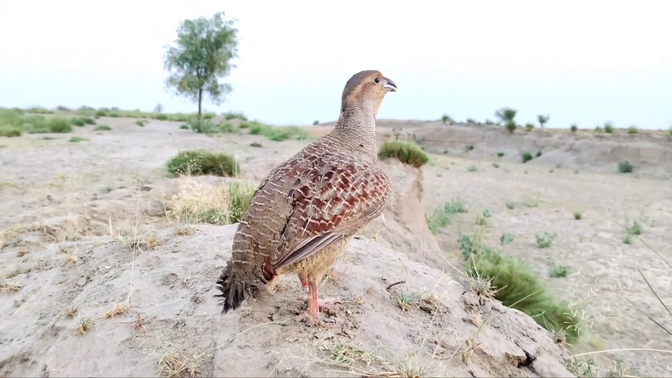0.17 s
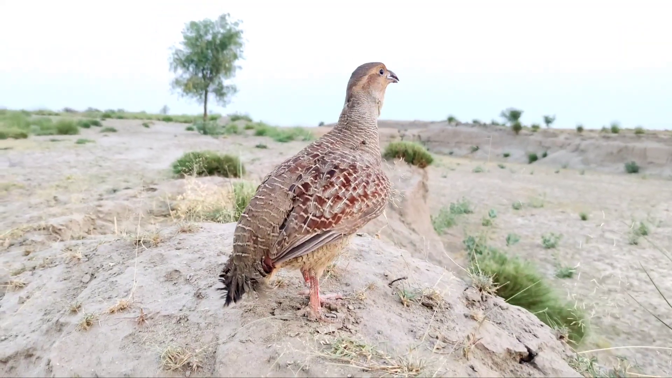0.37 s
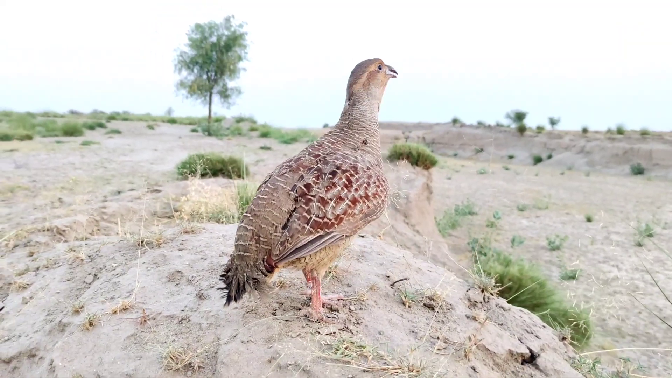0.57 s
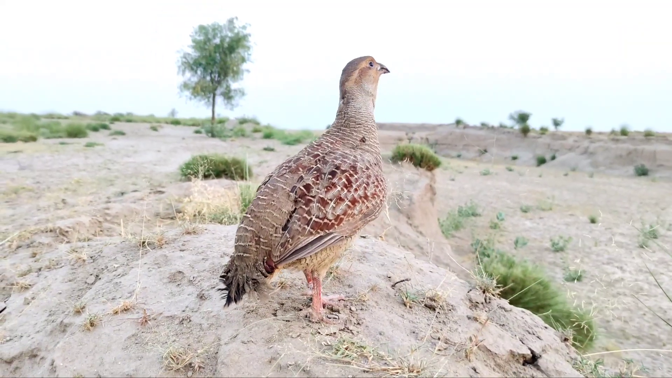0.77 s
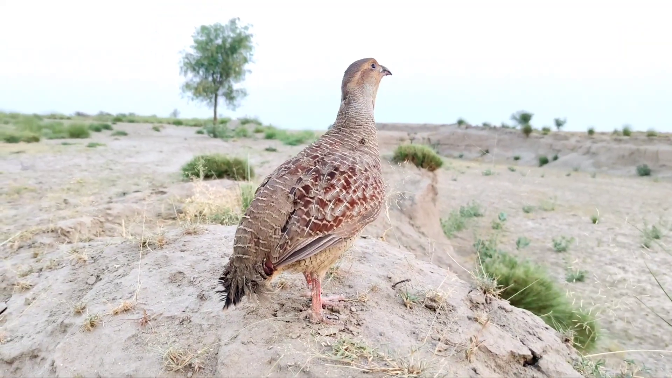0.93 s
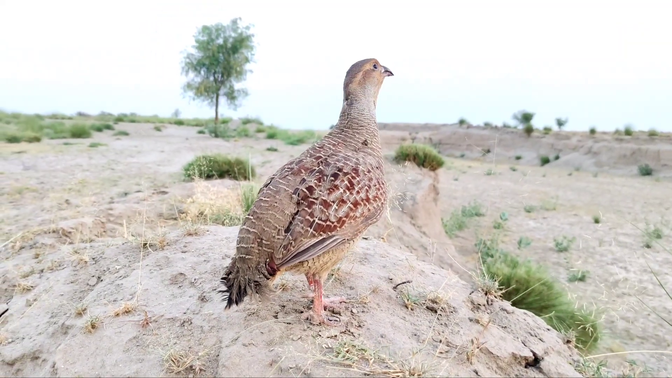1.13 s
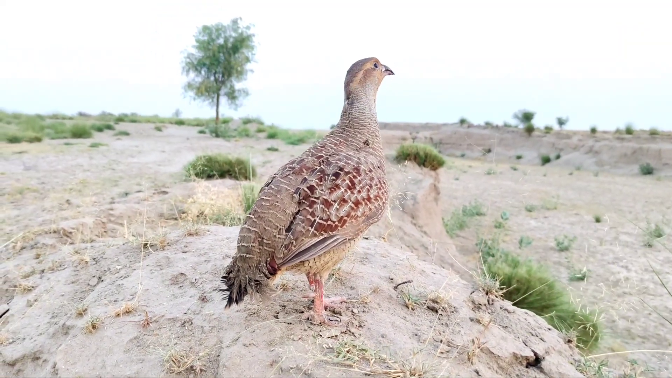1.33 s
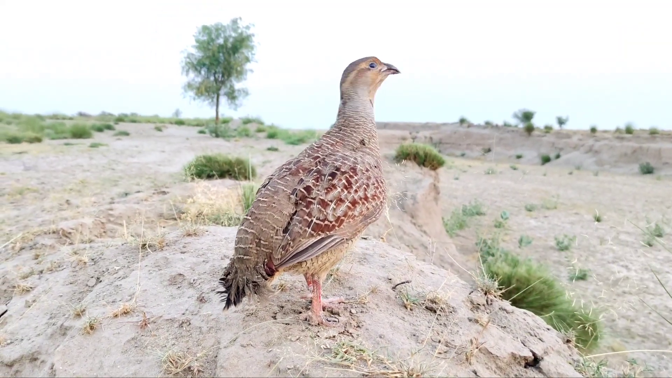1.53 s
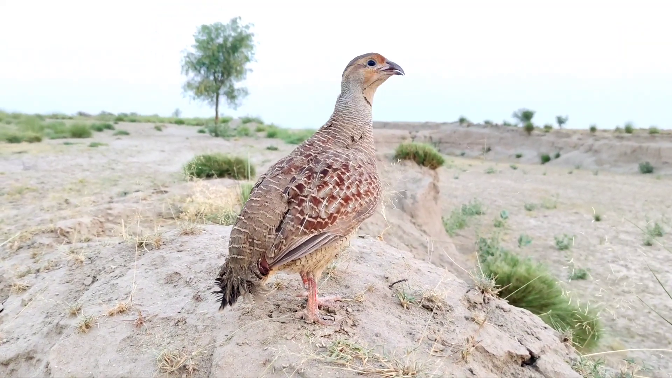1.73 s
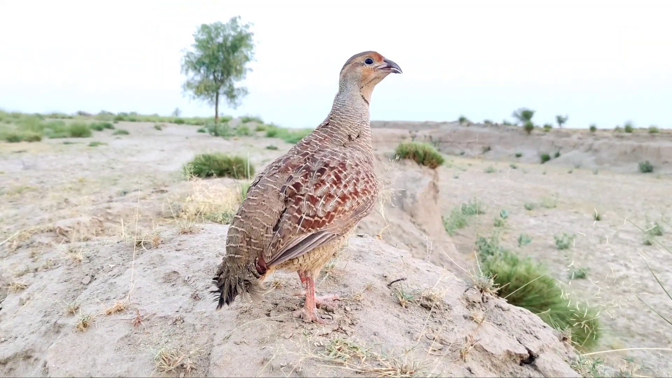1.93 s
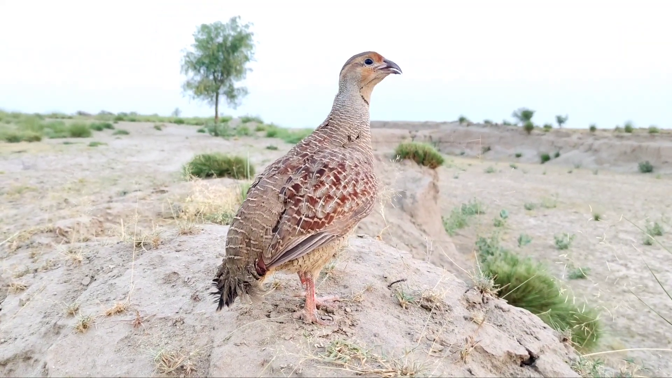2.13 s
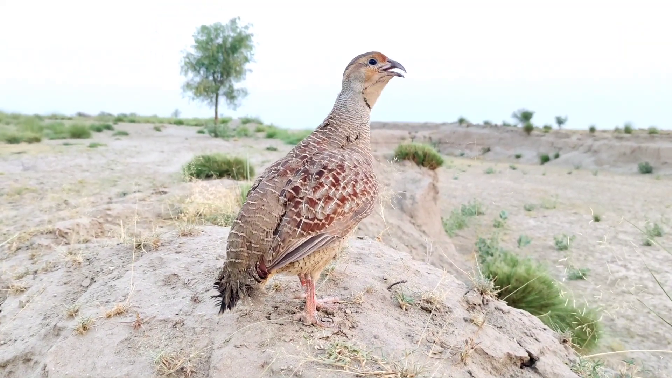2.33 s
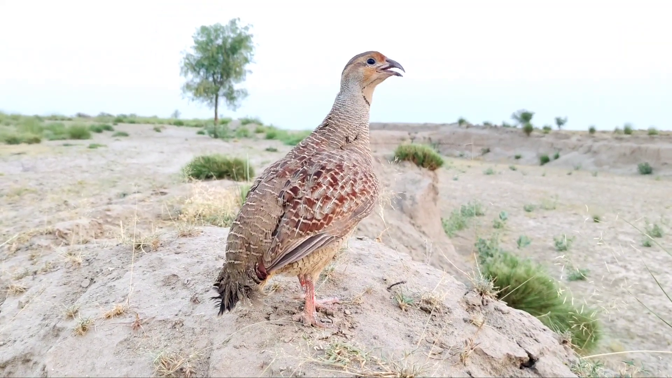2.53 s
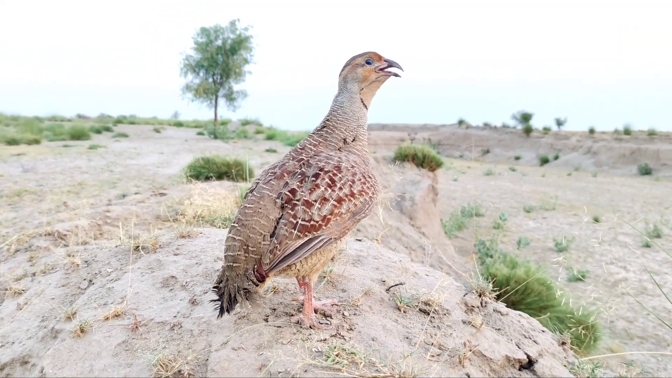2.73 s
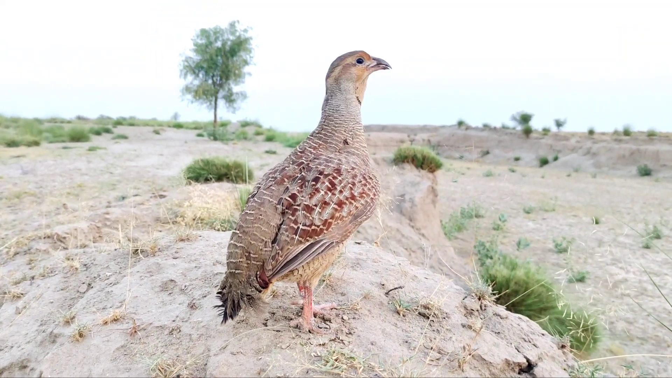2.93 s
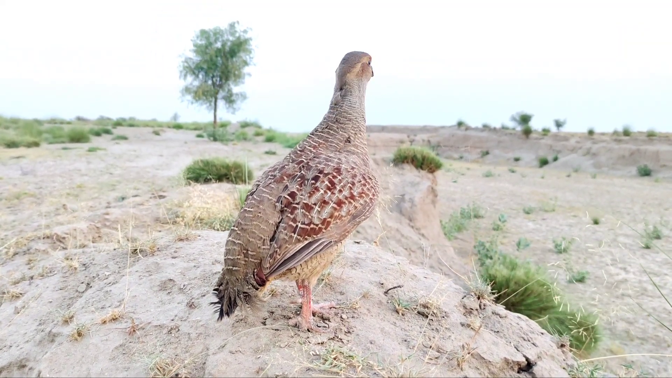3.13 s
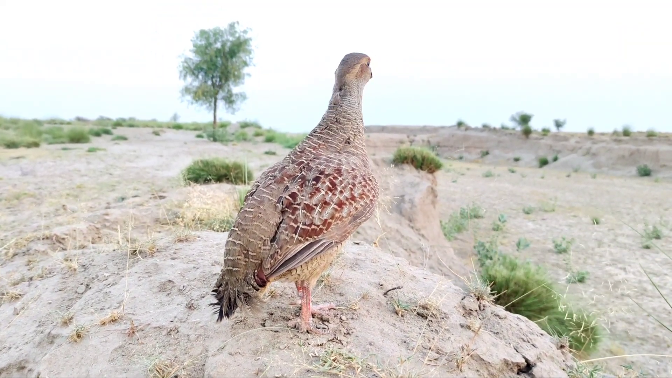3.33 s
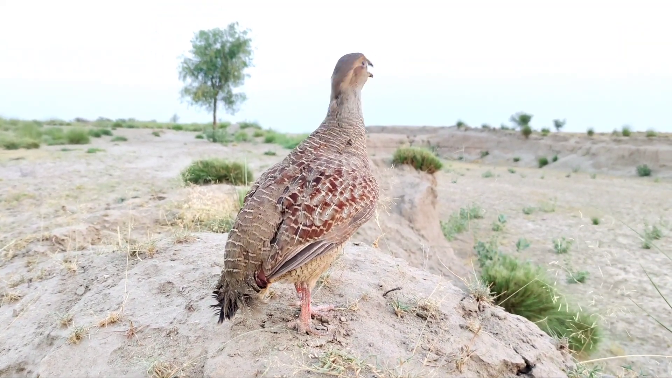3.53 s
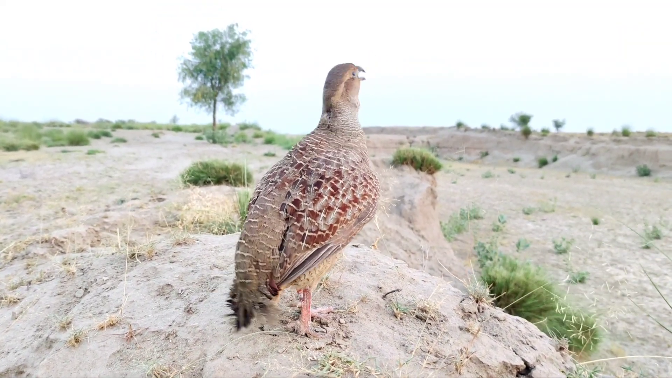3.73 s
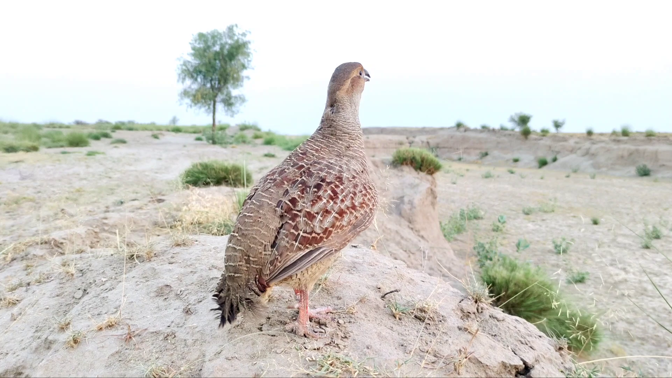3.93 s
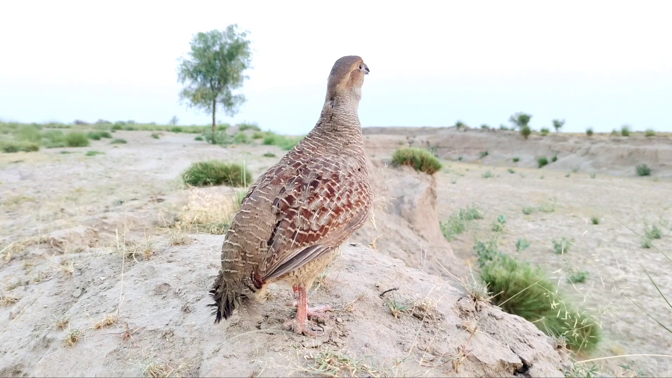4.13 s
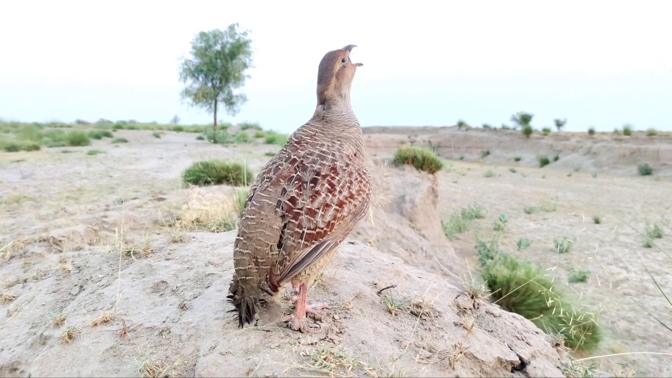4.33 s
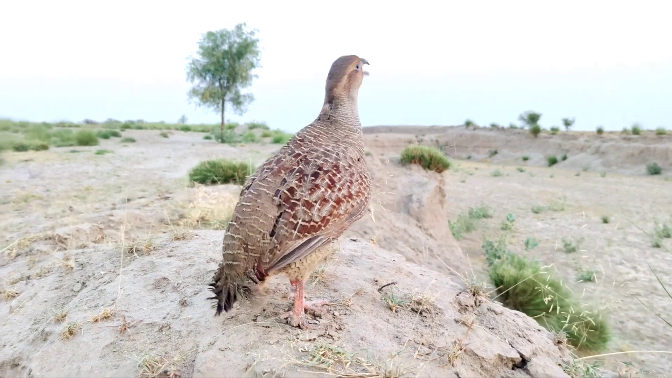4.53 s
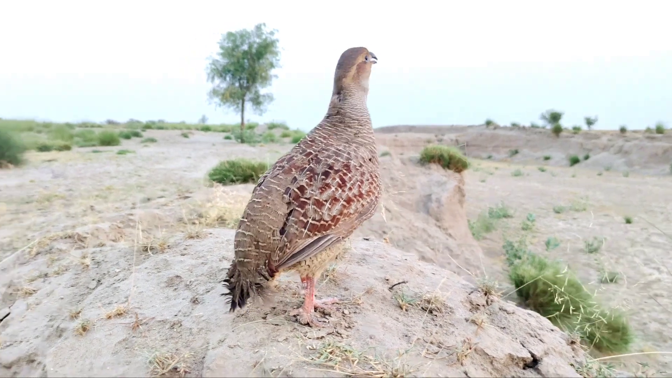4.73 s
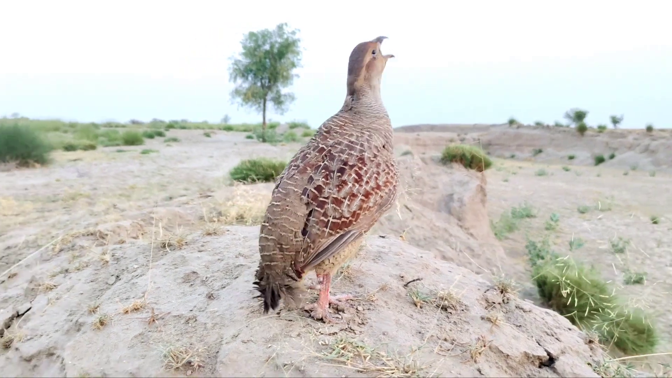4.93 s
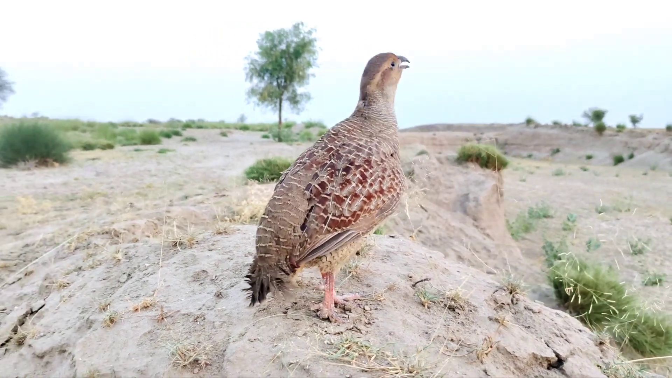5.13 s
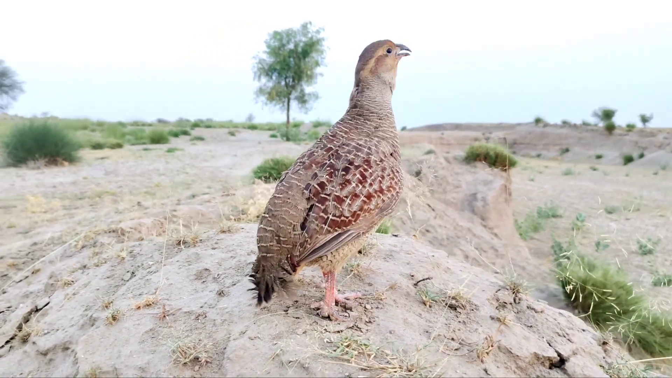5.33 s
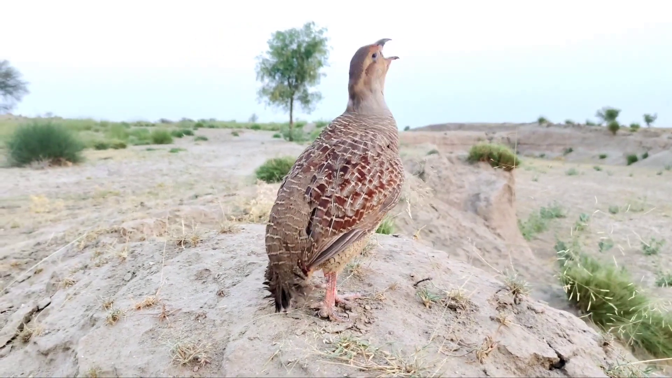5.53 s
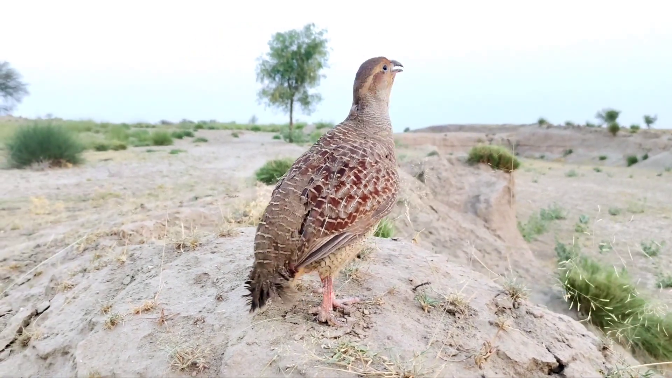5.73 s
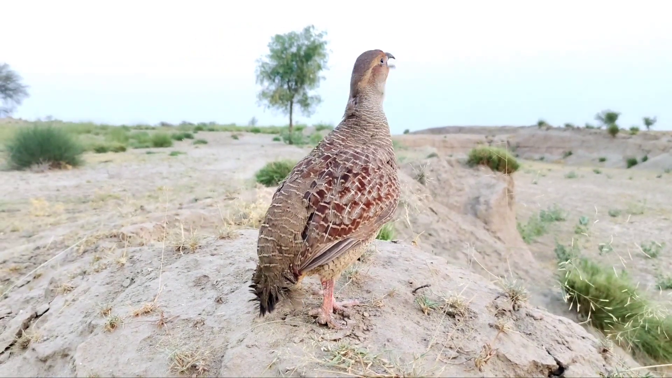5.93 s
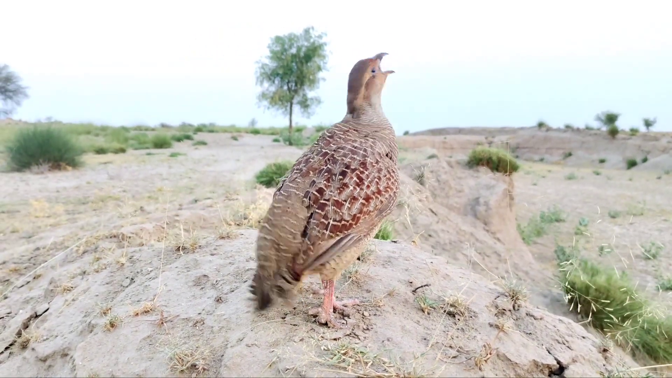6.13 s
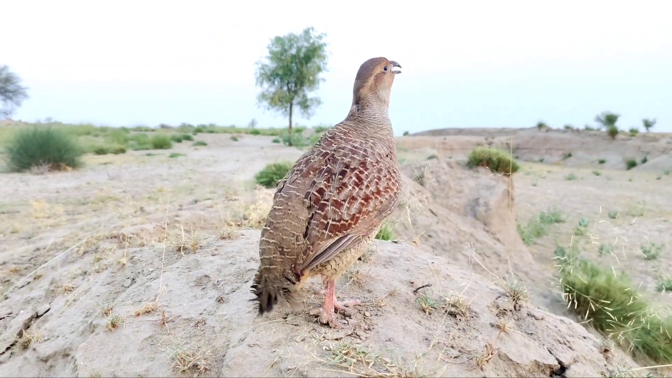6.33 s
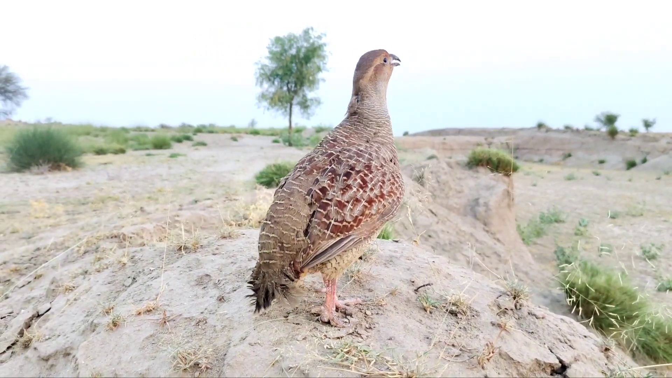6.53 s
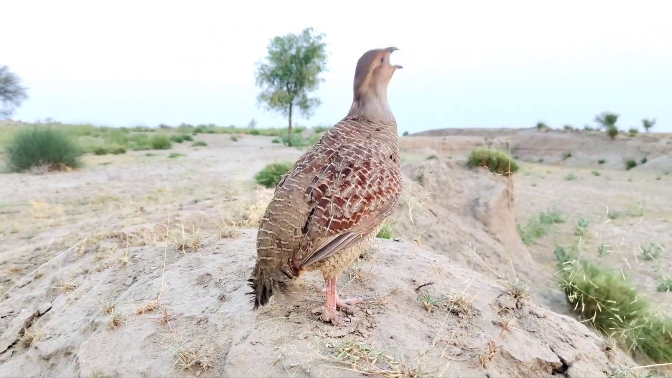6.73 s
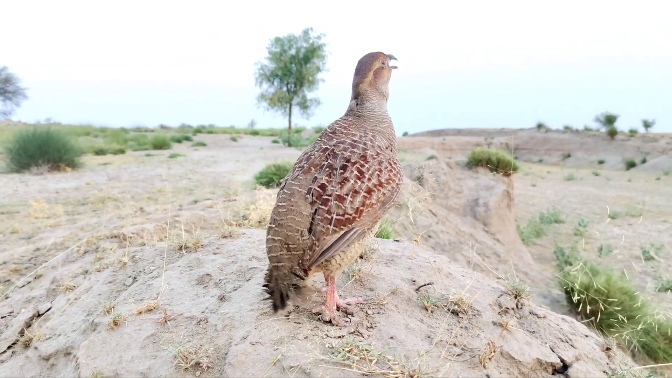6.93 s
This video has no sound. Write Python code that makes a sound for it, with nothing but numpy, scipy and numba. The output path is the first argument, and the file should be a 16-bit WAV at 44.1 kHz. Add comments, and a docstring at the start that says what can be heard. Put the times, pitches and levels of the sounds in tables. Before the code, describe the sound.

Two ground birds call close to the microphone in open dry scrub. One opens with a short shrill call and a run of fading throaty clucks, then goes quiet while the other gives evenly spaced, clear upward whistles. Midway the first bird breaks into loud, fast, ringing three-part phrases until the end, the whistles growing fainter beneath. Light wind and tiny distant bird chirps lie behind, with almost no echo.

```python
"""Francolin duet in open scrub

Two francolins call close by, spread over two ports. The cock's syllables start as a croak of syrinx
pulses through throat resonances, lock onto clear harmonic tones and croak out again.
The hen answers with long near-sine whistles that scoop up and end in a diffuse, fading tail.
A coloured noise halo follows the loudness of each call. Beneath lie wind of shaped noise,
far songbird sweeps with a dull tick, and a faint echo of the cock."""
import sys
import numpy as np
from scipy import signal
from scipy.fft import rfft, irfft, next_fast_len
from scipy.io import wavfile
from scipy.ndimage import uniform_filter1d
from numba import njit

SR = 44100
rng = np.random.default_rng(int(sys.argv[2]) if len(sys.argv) > 2 else 0)


def inscribe(sig):
    """Save sig as 16-bit PCM at rate SR to the path in sys.argv[1].

    A 1-D sig is mono; a 2-D sig holds one channel per row.
    Samples are clipped to [-1, 1] before scaling.
    """
    pcm = np.round(np.clip(np.atleast_2d(sig).T, -1, 1) * 32767)
    wavfile.write(sys.argv[1], SR, pcm.astype(np.int16))


N = 308249
T = np.arange(N) / SR
TOP_HZ = 15600  # upper edge of harmonics and output

# how hoarse the cock is, worst among his first keks and then clearing: (time [s], hoarseness [about 0-1])
HOARSENESS = [(3.75, .15), (3.98, 0.8), (4.26, 1.1), (4.4, 0.1), (4.7, 0.01)]


def undb(db):
    """Decibels to amplitude."""
    return 10 ** (np.asarray(db) / 20)


def span(start, end):
    """Samples of a note and the position 0-1 along it."""
    part = slice(int(start * SR), min(int(end * SR), N))
    return part, np.linspace(0, 1, part.stop - part.start)


def follow(table):
    """Control that glides through (time, value) points."""
    return np.interp(T, *np.transpose(table))


def soften(x, s):
    """Round the corners of a control with two moving averages of s seconds."""
    size = int(s * SR) + 1
    return uniform_filter1d(uniform_filter1d(x, size), size)


def walk(rate_hz):
    """Smooth random wander of spread 1."""
    x = soften(rng.standard_normal(N), 1 / rate_hz)
    return x / x.std()


def hiss(spectrum):
    """Noise of rms 1 with the given colour."""
    hz, db = np.transpose(spectrum)
    size = next_fast_len(N)
    bins = np.arange(size // 2 + 1) * SR / size
    gain = undb(np.interp(np.log(bins + 1), np.log(hz), db))
    x = irfft(rfft(rng.standard_normal(size)) * gain, size)[:N]
    return x / x.std()


@njit
def band_pass(x, hz, width):
    """State-variable band-pass with a moving centre and a width in Hz."""
    y, b, l = np.empty(len(x)), 0., 0.
    for i in range(len(x)):
        g, k = np.tan(np.pi * hz[i] / SR), width / hz[i]
        v = (b + g * (x[i] - l)) / (1 + g * (g + k))
        b, l, y[i] = 2 * v - b, l + 2 * g * v, k * v
    return y


def noise_band(hz, width):
    """White noise narrowed around a fixed or moving centre."""
    return band_pass(rng.standard_normal(N), np.full(N, 1.) * hz, width)


def pair(db, lead):
    """Complex gains of the two ports for a level difference and a phase lead; their mean is near 1 in size."""
    half = undb(db / 2) * np.exp(.5j * lead)
    return 2 * np.array([half, 1 / half]) / abs(half + 1 / half + .12)


def ports(x, table):
    """Split level and phase between the two ports by frequency."""
    hz, db, lead = np.transpose(table)
    size = next_fast_len(N)
    f = np.arange(size // 2 + 1) * SR / size
    gains = pair(np.interp(f, hz, db), np.interp(f, [0, *hz], [0, *lead]))
    return irfft(rfft(x, size) * gains, size)[:, :N]


def moving_ports(x, table):
    """Split level and phase of a narrow sound between the ports as its bearing changes."""
    s, db, lead = np.transpose(table)
    gains = pair(np.interp(T, s, db), np.interp(T, s, lead))
    return np.real(signal.hilbert(x, next_fast_len(N))[:N] * gains)


def noise_halo(gain):
    """Coloured noise around a call, following its loudness, partly unrelated at the two ports."""
    # colour of the halo: (frequency [Hz], relative level [dB])
    halo_colour = [(300, -11), (1500, 2), (4500, -5), (6500, -32.5), (10000, -12.5), (15000, -24.5)]
    return gain * (hiss(halo_colour) + .5 * np.array([[1], [-1]]) * hiss(halo_colour))


def wind():
    """Gusty rumble, partly shared by the ports, over a smooth unrelated hiss."""
    # colour of the wind: (frequency [Hz], relative level [dB])
    wind_colour = [(30, -18), (110, 1), (260, -11.5), (700, -22.5), (15000, -40)]
    # strength of the breeze ahead of the filter and make-up gain: (time [s], level [dB])
    gusts = [(0.0, -61.5), (6.8, -70)]
    left, right, both = (hiss(wind_colour) for _ in range(3))
    bass = signal.butter(1, 300, fs=SR, output="sos")
    own = np.array([left, right])
    gust = undb(follow(gusts) + 2.0 * walk(5.2) + 2. * walk(25))
    rumble = gust * signal.sosfilt(bass, 0.12 * both + 1.0 * own)
    smooth_hiss = own - signal.sosfilt(bass, own)
    return 1.6 * rumble + undb(-56) * smooth_hiss


def hen():
    """A near sine that scoops up after a low pop, trembles, glides and ends in a diffuse, fading tail."""
    # whistles: (start [s], end [s], scoop time [s], pitch after the scoop [Hz], last pitch [Hz],
    # level [dB], late minus early level [dB]); pitches are before any step
    whistles = [(0, 0.049, .001, 3375, 3292, -15.5, -3), (0.491, 0.699, .011, 3330, 3440, -15.5, 0),
                (1.139, 1.351, 0.009, 3432, 3538, -14, -2), (1.966, 2.134, 0.0061, 2782, 2824, -22, -1.5),
                (2.725, 2.886, .022, 3608, 3702, -12.5, -2), (3.519, 3.703, 0.014, 3534, 3553, -12, 2.5),
                (4.207, 4.393, 0.0078, 3550, 3758, -14, -0.5),
                (4.867, 5.038, 0.0089, 3512, 3756, -22.5, -10.5),
                (5.507, 5.658, 0.03, 3660, 3784, -26.5, -9.5), (6.135, 6.299, 0.05, 3852, 3620, -27, 2.5),
                (6.747, 6.936, 0.026, 3763, 3724, -27, -6.5)]
    # sudden steps of pitch inside a whistle: (time [s], step [Hz])
    steps = [(1.284, 140.5), (2.126, 170), (2.84, -75), (2.862, 92.5), (3.651, 70.5), (6.191, 131)]
    tail_s = .06  # length of the fading tail
    arch_db, scoop_hz_s = 0.5, 13750  # the scoop starts to climb at this rate
    hz, gain, pop = np.full(N, 3400.), np.zeros(N), np.zeros(N)
    for start, end, scoop_s, hz1, hz2, mid_db, tilt_db in whistles:
        early_db = mid_db - arch_db - tilt_db / 2
        late_db = mid_db - arch_db + tilt_db / 2
        part, u = span(max(start - .012, 0), end + tail_s)
        s = T[part]
        scoop = np.exp(-np.clip(s - start, 0, 1) / scoop_s)
        glide = np.clip((s - start) / (end - start), 0, 1)
        pitch = hz1 + (hz2 - hz1) * glide - scoop_hz_s * scoop_s * scoop
        for at, step_hz in steps:
            if start < at < end:
                pitch = pitch + step_hz * np.clip((s - at) / 0.024, 0, 1)
        times = start + (end - start) * np.array([.15, .5, .85])
        level = undb(np.interp(
            s, [start - .012, start, *times, end, end + 0.011, end + tail_s],
            [-50, early_db - 6.0, early_db, mid_db, late_db, late_db - 4.0, late_db - 20.5, late_db - 58]))
        # where two whistles overlap the stronger one wins
        hz[part] = np.where(level >= gain[part], pitch, hz[part])
        gain[part] = np.maximum(level, gain[part])
        pop[part] = undb(early_db - 29.5) * np.exp(-20 * u)
    # the pitch blurs as the level falls
    faint = undb(-68) / (gain ** 2 + undb(-68))
    blur = .004 * walk(60) + (.003 + .05 * faint) * walk(900)
    phase = 2 * np.pi * np.cumsum(hz * (1 + blur)) / SR
    tremble = undb(1.2 * walk(70) + 1.1 * walk(720))
    whistle = np.sqrt(2) * tremble * np.sin(phase)
    loudness = soften(gain ** 0.54, .006)
    # noise hugging the whistle, tight and then wide
    skirt = undb(-6) * loudness * noise_band(hz, 170.0)
    skirt = skirt + undb(-32 + 1.1 * walk(40)) * loudness * noise_band(0.99 * hz, 1000.0)
    low_noise = undb(-27 + 7.9 * walk(60)) * loudness * noise_band(1250, 180.0)
    thump = pop * noise_band(180, 300.0) * 10
    halo = noise_halo(undb(-24 + 1.0 * walk(30)) * soften(gain ** 1.24, 0.016))
    return gain * whistle + skirt, thump + low_noise + halo


def low_high(start, leap, end, hz, db, high_db, fade_db, sag, arch_db):
    """A low-register note and, if it leaps, the high-register note that the membranes break into."""
    low_end = leap or end
    length = low_end - start
    # the low register swells before a leap, else fades; a long low note holds its strength
    swell = (db - 5.5, db, 1.1) if leap else (db - 4.5, db - 16, 6.)
    if length > .04:
        swell = (db, db - 5.5, 1)
    low_bend = 1.9 if length < .04 else 1
    notes = [(start, low_end, hz, hz - 10840 * length, low_bend, *swell)]
    if leap:
        high_hz, top_db = 1.19 * hz, db + high_db
        notes.append((leap, end, high_hz, high_hz * (1 - sag), 2.8, top_db, top_db - fade_db, arch_db))
    return notes


def syllables():
    """The cock's calls, cut into locked tones and the loose croaks before and after them.

    Tones are (start, end, Hz, Hz, bend, dB, dB, arch dB), leads (start, end, burst dB),
    tails (start, end, dB, dies)."""
    # level "ka" that opens the long call: (croak starts [s], locks [s], tone ends [s], pitch [Hz],
    # level [dB], burst of the croak [dB])
    kas = [(.093, 0.137, .168, 1781, -7, 7), (3.698, 3.748, 3.778, 1843, -7, 7),
           (4.386, 4.424, 4.45, 2422, -7.5, 11.5), (4.999, 5.033, 5.057, 2463, -8, -0.5),
           (5.624, 5.659, 5.682, 2488, -9, -0.5), (6.263, 6.295, 6.319, 2457, -8, 3.5),
           (6.887, 6.92, 6.948, 2467, -8.5, 1)]
    # low pitch [Hz], level [dB], level of the drop [dB])
    teers = [(.192, None, .241, .258, 1794, -8.5, -15.5), (3.8, 3.821, 3.846, 3.877, 1860, -6.5, -14.5),
             (4.477, 4.488, 4.536, 4.564, 1968, -6.5, -15.5), (5.084, 5.088, 5.144, 5.171, 1991, -7, -12.5),
             (5.709, 5.713, 5.773, 5.803, 1997, -8, -15), (6.347, 6.35, 6.414, 6.439, 1995, -7.5, -12.5),
             (6.976, None, 6.989, 6.99, 1904, -6, -31.5)]
    keks = [(3.986, 4.012, 4.023, 4.035, 1459, -6.5), (4.1, 4.121, 4.135, 4.15, 1500, -4.5),
            (4.212, 4.237, None, 4.256, 1421, -5), (4.675, 4.698, 4.716, 4.734, 1687, -6.5),
            (4.795, 4.812, 4.829, 4.854, 1640, -7), (4.915, 4.932, None, 4.956, 1622, -7),
            (5.291, 5.313, 5.329, 5.354, 1712, -7), (5.413, 5.432, 5.447, 5.477, 1708, -5.5),
            (5.538, 5.554, None, 5.58, 1678, -5.5), (5.92, 5.94, 5.956, 5.981, 1738, -6),
            (6.041, 6.058, 6.073, 6.101, 1694, -6), (6.165, 6.181, None, 6.211, 1593, -7.5),
            (6.559, 6.579, 6.596, 6.617, 1727, -5.5), (6.678, 6.696, 6.713, 6.737, 1676, -6),
            (6.799, 6.816, None, 6.841, 1563, -7.5)]
    slip_hz, slip_s, slip_fade_db = 1812, 0.0086, 13  # high notes slip down before the gap
    drop_hz, drop_share, drop_fade_db = 1405, .9, 23.5
    notes, leads, tails = [], [], []
    for (start, lock, end, hz, db, burst_db), teer in zip(kas, teers):
        leads.append((start, lock, burst_db))
        notes.append((lock, end, hz, hz * (1 - 0.015), 2.8, db, db, -1.5))
        if hz > 2000:
            notes.append((end, end + slip_s, slip_hz, slip_hz, 1, db + 0.5, db - slip_fade_db, 0))
        tails.append((notes[-1][1], teer[0], -27.5, False))
    for start, leap, drop, silent, hz, db, drop_db in teers:
        # the later the leap, the weaker the high note
        high_db = -2.5 - 301 * ((leap or start) - start)
        notes += low_high(start, leap, drop, hz, db, high_db, 5.5, .18, -0.57)
        if leap:
            drop_end = drop + drop_share * (silent - drop)
            notes.append((drop, drop_end, drop_hz, drop_hz, 1, drop_db, drop_db - drop_fade_db, 0))
        tails.append((drop, silent, drop_db - 3.5, True))
    for start, lock, leap, end, hz, db in keks:
        leads.append((start, lock, None))
        notes += low_high(lock, leap, end, hz, db, -9, 17.5, 0.23, 1.5)
        tails.append((end, end + 0.012, db + (-16 if leap else -25), True))
    return notes, leads, tails


@njit
def pulses(hz, stretch, size):
    """A pulse at each wrap of the phase; every cycle has its own length and size."""
    out, p, k = np.zeros(len(hz) + 1), 0., 0
    for i in range(len(hz)):
        step = hz[i] * stretch[k] / SR
        p += step
        if p >= 1:
            p, k = p - 1, k + 1
            # share the pulse between two samples to place it finely
            out[i] += size[k] * p / step
            out[i + 1] += size[k] * (1 - p / step)
    return out[:-1]


def croaks(leads, tails, tone_gain):
    """Loose membranes: slow pulses ring two throat resonances that rise as the beak opens."""
    # clucks that never lock: (start [s], end [s], drive ahead of the throat [dB], nominal top pulse rate [Hz])
    clucks = [(0.365, 0.426, -7, 1017), (.471, 0.529, -6, 905), (0.585, 0.625, -14.5, 441.3),
              (0.678, 0.72, -11.5, 515.5), (0.755, 0.797, -14.5, 393.7), (0.856, 0.903, -17.5, 346.2),
              (0.969, 1.021, -22, 322.9), (1.086, 1.129, -27, 312.5)]
    rate, gain, beak = np.full(N, 750.), np.zeros(N), np.full(N, .3)
    hoarse, shut = follow(HOARSENESS), np.zeros(N)
    rough, chest_db = np.full(N, .9), np.full(N, -18.)
    for start, end, burst_db in leads:
        is_ka = burst_db is not None
        part, u = span(start, end)
        s = T[part] - start
        if is_ka:
            burst = burst_db * np.exp(-((s - 0.01) / 0.01) ** 2)
            level_db = -21.5 + burst
        else:
            level_db = np.minimum(-30 + 1100 * s, -10 - 4.442 * hoarse[part])
        rate[part] = np.minimum(350 + (26000 if is_ka else 22000) * s, 950)
        gain[part] = undb(level_db)
        beak[part] = np.minimum(s / (.012 if is_ka else .03), 1 - 0.84 * hoarse[part])
    for start, end, db, dies in tails:
        part, u = span(start, end + .003)
        # it sinks and dies away unless the next tone follows at once
        rate[part] = 700 - 300 * u if dies else 900
        gain[part] = undb(db - 35 * u ** 1.5 if dies else db + 8 * (.5 - np.sin(np.pi * u)))
        beak[part] = .1 if dies else .6
    for start, end, db, top_hz in clucks:
        part, u = span(start, end)
        arch = np.sin(np.pi * u ** .8)
        rate[part] = 290 + (top_hz - 290) * arch
        if top_hz > 800:  # a strong cluck climbs, makes a small upward jump and sags
            rate[part] = top_hz * np.where(u < .36, .35 + u, 1.2 - .5 * u)
            arch = np.sin(np.pi * u ** .65)
        gain[part] = undb(db - 7.0 - (8 + top_hz / 90) * (1 - arch) ** 1.3 - 10 * u ** 12)
        shut[part] = .85 - top_hz / 2000
        rough[part], chest_db[part] = .28, -15
        beak[part] = (rate[part] - 800) / 1300
    chance = rng.standard_normal((N // 20, 2)).T
    # a hoarse voice keeps croaking under its tones
    gain = soften(np.maximum(gain, .28 * hoarse * tone_gain), .002)
    # the harder the effort, the less even the beat
    uneven = np.exp(rough * gain * walk(500))
    beat = pulses(rate * uneven, np.exp(.045 * chance[0]), undb(2.5 * chance[1]))
    beat = gain * (np.sqrt(SR / rate) * beat + .18 * rng.standard_normal(N))
    throat_hz = 1350 + 800 * soften(beak, 0.0002)
    upper_hz = 2750 + 400 * soften(beak, 0.00094)
    chest = band_pass(beat, rate, 380.0)
    first = band_pass(band_pass(beat, throat_hz, 500.), throat_hz, 1100.)
    second = band_pass(band_pass(beat, upper_hz, 500.), upper_hz, 900.)
    edge = band_pass(beat, np.full(N, 4300.), 1100.0)
    voice = first - undb(-13.0 + 2.2 * beak) * second + undb(chest_db) * chest + undb(-29.5) * edge
    # a closed beak hollows out the middle and swallows the treble
    voice = voice - shut * band_pass(voice, np.full(N, 2080.), 550.0)
    dull = signal.sosfilt(signal.butter(4, 3200, fs=SR, output="sos"), voice)
    voice = np.where(shut > 0, dull, voice)
    windpipe = signal.butter(2, [300, 5200], "band", fs=SR, output="sos")
    return undb(16.5) * signal.sosfilt(windpipe, voice), gain * rough ** 2


def tones(notes):
    """Locked membranes: a clean harmonic stack whose pitch bends along each note."""
    # strength of each harmonic from the fundamental up, ahead of colour and flutter: level [dB]
    harmonics = [3, -14, -32, -39.5, -41, -49, -55.5, -54]
    # colour the beak gives the harmonics: (frequency [Hz], level [dB])
    beak_colour = [(5000, -2), (6500, -6.5), (8000, -6), (10000, 8.5), (15000, 6)]
    hz, gain, passing = np.zeros(N), np.zeros(N), np.zeros(N)
    for start, end, hz0, hz1, bend, db0, db1, arch_db in notes:
        part, u = span(start, end)
        # it locks from just below
        hz[part] = hz0 + (hz1 - hz0) * u ** bend - 170 * np.exp(-u / .09)
        passing[part] = end - start < .0125  # too brief to grow full overtones
        level_db = db0 + (db1 - db0) * u ** 1.3 + 4.8 * arch_db * u * (1 - u)
        if end - start > .022 and arch_db < 2:
            level_db = level_db + 2.5 * np.exp(-u / .2)  # overshoot as the tone locks
        gain[part] = undb(level_db)
    hoarse = follow(HOARSENESS)
    gain = soften(gain, .0016) * undb(hoarse * (4.3 * np.tanh(walk(250)) - 2.0))
    hz = soften(np.interp(T, T[hz > 0], hz[hz > 0]), .0006)
    phase = 2 * np.pi * np.cumsum(hz * (1 + (.006 + 0.013 * hoarse) * walk(690))) / SR
    # every second cycle differs a little
    halves = sum(undb(-35 + 6 * walk(60)) * np.sin(k * phase / 2) for k in (1, 3))
    # noise torn loose once a cycle, stronger as the register breaks
    jump = np.minimum(soften(abs(np.gradient(hz)), 0.005) / 6.9, 1)
    rasp = (undb(-32) + undb(-17) * jump) * (1 + np.sin(phase)) * noise_band(3380, 2200.0)
    stack = np.zeros(N)
    for k, db in enumerate(harmonics):
        order_hz = (k + 1) * hz
        loss_db = (10.0 * hoarse + 6.6 * passing) * (k > 0)
        colour_db = np.interp(order_hz, *np.transpose(beak_colour))
        flutter_db = 1.0 * k * walk(400)  # each higher harmonic flutters more
        level = undb(db - loss_db + colour_db + flutter_db)
        stack += level * (order_hz < TOP_HZ) * np.sin((k + 1) * phase)
    return gain * (halves + rasp) + gain * np.sqrt(2) * stack, gain


def cock():
    """Tones and croaks, with a coloured noise halo that follows their loudness."""
    notes, leads, tails = syllables()
    tone, tone_gain = tones(notes)
    croak, croak_gain = croaks(leads, tails, tone_gain)
    halo_gain = undb(-43.5) * np.sqrt(abs(tone_gain)) + undb(-20.0) * abs(croak_gain) ** 0.67
    return tone + croak, noise_halo(halo_gain)


def echo(x):
    """Scrub and ground scatter a little back: two decaying noise tails, unrelated at the two ports."""
    s = T[:SR // 2]
    decay = undb(-45.5) * np.exp(-s / 0.012) + undb(-70.5) * np.exp(-s / .06)
    tail = rng.standard_normal((2, len(s))) * decay
    return signal.fftconvolve(x[None], tail, axes=1)[:, :N]


def far():
    """Faint songbird sweeps, smeared by turbulent air, and a dull tick of band-passed noise."""
    # songbird sweeps: (start [s], end [s], first pitch [Hz], last pitch [Hz], peak level [dB])
    chirps = [(2.268, 2.309, 3800, 4250, -64), (3.155, 3.187, 3800, 2900, -65),
              (3.288, 3.31, 3860, 4380, -61), (3.322, 3.36, 4050, 3400, -65.5),
              (3.352, 3.402, 3340, 4380, -56.5)]
    tick_s, tick_db = 2.231, -48
    out, waver = np.zeros(N), 1 + .035 * walk(300)
    for start, end, hz0, hz1, db in chirps:
        part, u = span(start, end)
        phase = 2 * np.pi * np.cumsum((hz0 + (hz1 - hz0) * u) * waver[part]) / SR
        out[part] += undb(db) * np.sin(np.pi * u) * np.sin(phase)
    grit = noise_band(700, 900.0)
    return out + undb(tick_db) * (T > tick_s) * np.exp(-abs(T - tick_s) / 0.013) * grit


def scene():
    """Both birds placed between the ports, over the cock's echo, the far sounds and the wind."""
    # how the ports take the cock: (frequency [Hz], left minus right level [dB], left leads by [rad])
    cock_split = [(900, -2, 0), (1600, -1, .45), (2150, 5, .3), (2500, 2.5, -.35), (3600, 3.4, -1.4),
                  (4900, 14, -4.4), (8000, 0, -4.6)]
    # she walks about, so each whistle meets the ports differently:
    # (time [s], left minus right level [dB], left leads by [rad])
    hen_bearing = [(.5, -1.1, .66), (1.2, 1.7, .06), (2., .2, -1.6), (2.8, 2.8, -.7), (3.6, 2, -.3),
                   (4.3, -.3, -1.3), (4.95, 6, -2.3), (5.6, 5, -2.85)]
    male, male_halo = cock()
    female, female_noise = hen()
    birds = ports(male, cock_split) + moving_ports(female, hen_bearing) + male_halo + female_noise
    return birds + echo(male) + far() + wind()


def record(dry):
    """The recorder rounds the loudest peaks, drops the deepest bass and cuts the top."""
    rounded = dry / (1 + abs(dry) ** 8) ** (1 / 8)
    thin = signal.sosfilt(signal.butter(2, 70, "high", fs=SR, output="sos"), rounded)
    return signal.sosfilt(signal.ellip(8, .2, 70, TOP_HZ, fs=SR, output="sos"), thin)


dry = scene()
out = record(dry)
inscribe(out)
```